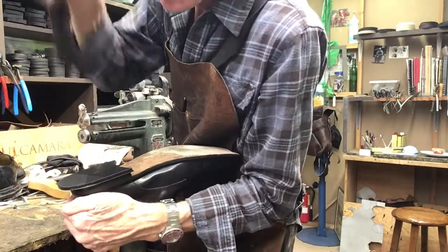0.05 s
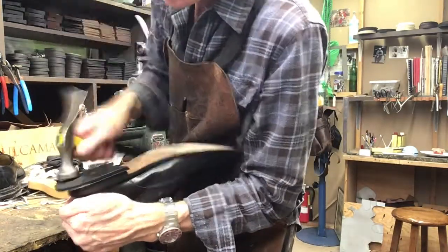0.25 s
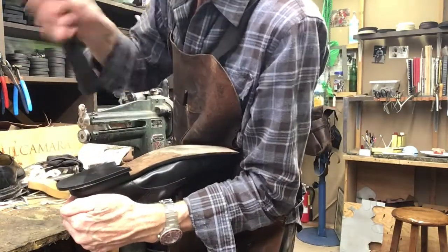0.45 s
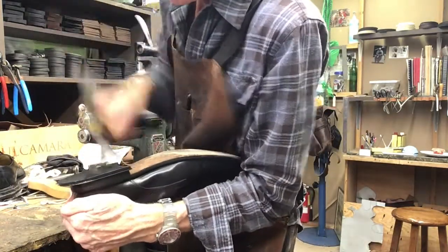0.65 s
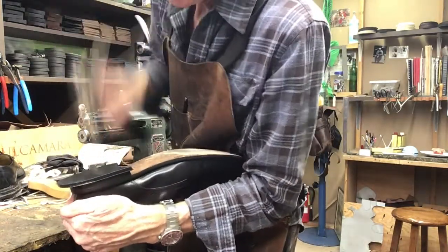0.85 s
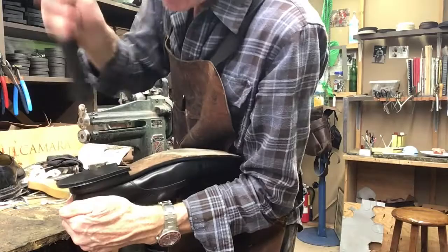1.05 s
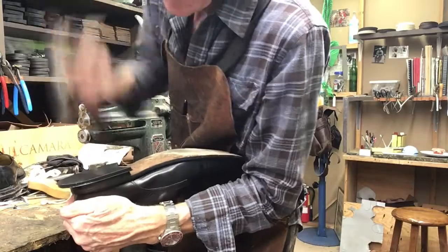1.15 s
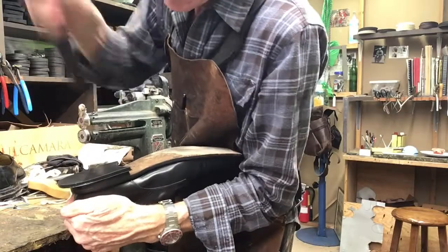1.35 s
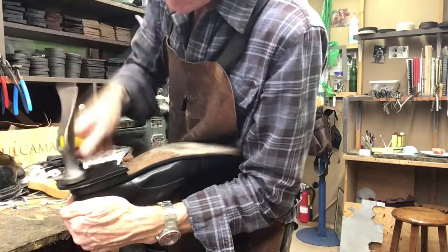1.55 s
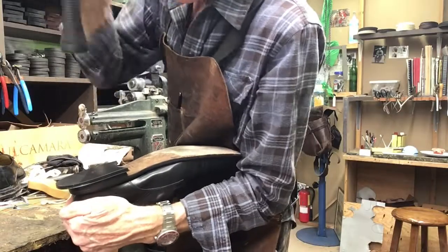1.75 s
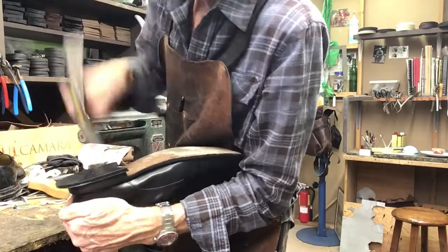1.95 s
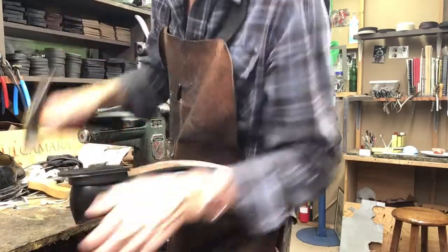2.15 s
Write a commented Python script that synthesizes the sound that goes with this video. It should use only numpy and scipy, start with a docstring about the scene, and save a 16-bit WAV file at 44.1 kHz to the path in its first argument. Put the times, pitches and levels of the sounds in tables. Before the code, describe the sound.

Close, evenly paced hammer blows land on a shoe heel in a small, quiet workshop. Six cracks with hollow thuds set the bench humming and steel ringing faintly, then the shoe shifts with a soft knock.

```python
"""A cobbler hammers the heel of a shoe at a workbench, close by, about three blows a second.
Each blow is a sharp crack as the hammer lands and a hollow thud from the shoe. The bench hums on,
the steel rings faintly, and the small crowded workshop echoes. A light knock follows the last blow.
Quiet room air lies under it all, and the loudest peaks overload the recorder."""
import sys
import numpy as np
from scipy import signal
from scipy.fft import rfft, irfft
from scipy.io import wavfile
from scipy.ndimage import uniform_filter1d

SR = 44100
rng = np.random.default_rng(int(sys.argv[2]) if len(sys.argv) > 2 else 0)


def file_out(sig):
    """Save sig as 16-bit WAV at sys.argv[1]."""
    # one column per channel
    cols = np.atleast_2d(sig).T
    # limit, then scale
    lim = np.clip(cols, -1, 1)
    pcm = np.round(lim * 32767).astype(np.int16)
    wavfile.write(sys.argv[1], SR, pcm)


N = 97020
T = np.arange(N) / SR
HZ = np.fft.rfftfreq(N, 1 / SR)  # the frequencies in a spectrum of the whole sound
# A "fade time" (t60) is the time in seconds that a sound needs to drop by 60 dB.


def hammering():
    """All the blows: the crack comes first, then the thud and the ringing, then the room's echo."""
    # Each row: start in seconds, level in dB, crack in dB, pitch of the thud as a ratio, upper thud in dB,
    # low bench ring in dB, high bench ring in dB, steel in dB, clack pitch in Hz, clack in dB,
    # echo treble in dB, treble cutoff in Hz. The dB values turn each part up or down for that blow.
    # The first blow lands just before the sound begins.
    blows = [(-.115, -2, -2, 1, -5, -2, -7.5, 4, 2280, -2, 3, 13000),
             (.2326, 0, 5, 0.952, 4.5, 2, -9.5, -1.5, 2110, -10, 3.5, 12500),
             (.5867, -1.5, 2.5, 1.102, 0, -7, 3.5, -18, 2050, -2, 1, 19000),
             (.8789, -1.5, 0.5, 1.096, -1, 5, 4.5, -11.5, 2460, -3.5, -4, 16200),
             (1.1926, 1, 2.5, 1.0, -1, 5.5, -1.5, -7, 1557, -4, 0.5, 13400),
             (1.5379, -0.5, 0, 0.99, 5.5, 5.5, -4, -1, 3270, -8.5, 3, 12400),
             (1.8886, -1.5, 6, 1.06, -12, 4.5, 2, -15, 2600, -0.5, 5, 13100)]
    shared_noise = rng.standard_normal(N)
    out = 0
    for (start, db, crack_db, pitch, upper_db, low_db, high_db,
         steel_db, clack_hz, clack_db, treble_db, cutoff_hz) in blows:
        contact = undb(crack_db) * crack() + undb(clack_db) * clack(clack_hz)
        thud = at(shoe_thud(pitch, upper_db), seconds=.0007)
        rings = bench_ring(low_db, high_db) + undb(steel_db) * steel_ring()
        echo = at(brighten(workshop_echo(shared_noise), treble_db), seconds=.0035)
        soften = signal.butter(3, cutoff_hz, fs=SR, output="sos")  # a softer hit has less top treble
        blow = signal.sosfilt(soften, contact + thud + rings + echo)
        out = out + undb(db) * at(blow, start)
    return out


def crack():
    """The hammer face meets the heel in a very short burst of noise."""
    # Each row: frequency in Hz, relative level in dB.
    spectrum = [(300, 16.5), (1000, 12), (2000, -5), (3500, 4), (6000, -11), (10000, -11), (13500, -9),
                (16000, -16)]
    return undb(1.5) * colour(rng.standard_normal(N), spectrum) * fade(t60=.0088)


def clack(hz):
    """The heel gives a short hard note that trails off in the room; where it is hit sets the pitch."""
    trail = undb(-14) * cluster(hz, spread_hz=240) * fade(t60=.22)
    return undb(-7) * (tone(hz) * fade(t60=.027) + trail)


def shoe_thud(pitch, upper_db):
    """The heel thuds hollowly: each of its notes holds for a few cycles, then the hand damps it."""
    # Notes of the shoe on its iron stand. Each row: pitch in Hz, relative level in dB, fade time in seconds.
    notes = [(63.4, -31.5, 0.17), (137.7, -20.5, 0.036), (337, -0.5, 0.0053), (656, -5.5, 0.019),
             (825, -10.5, 0.02), (1080, -6, 0.015), (1380, -11, 0.02)]
    upper_above_hz, hold_cycles = 500, 2.2
    thud = 0
    for hz, db, t60 in notes:
        gain = undb(db + upper_db * (hz > upper_above_hz))
        time_damped = np.maximum(T - hold_cycles / hz, 0)
        thud = thud + gain * tone(hz * pitch) * np.exp(-np.log(1000) * time_damped / t60)
    return thud * rise(seconds=.0012)


def bench_ring(low_db, high_db):
    """The bench takes up the blow and hums; where the blow lands decides which notes ring most."""
    # Each row: pitch in Hz, relative level in dB, fade time in seconds.
    notes = [(109, -24, .2), (284, -17, .28), (316, -26, .25), (400, -15.5, .36), (422, -19, .26),
             (458, -26, .22), (548, -22, .2), (622, -24, .18), (670, -27, .2), (974, -26, .18)]
    low_below_hz = 350
    ring = 0
    for hz, db, t60 in notes:
        gain = undb(db + (low_db if hz < low_below_hz else high_db))
        ring = ring + gain * tone(hz) * fade(t60)
    hollow_top = undb(-24.5 + high_db) * cluster(hz=410, spread_hz=70) * fade(t60=.44)
    return (undb(-1) * ring + hollow_top) * rise(seconds=.018)


def steel_ring():
    """The hammer head and the iron stand ring thinly; close notes waver, a little differently each blow."""
    # Each row: middle pitch of a group of notes in Hz, relative level in dB, fade time in seconds.
    groups = [(1310, -3, .18), (2110, -7, .25), (2580, -6, .2), (3150, -9, .27), (3370, -6, .24),
              (3570, -8, .24), (3945, -1, .15), (4325, -4, .16), (5240, -9, .18), (5790, -9, .17),
              (6200, -12, .2), (6748, -2, .17), (7510, -14, .24), (8820, -11, .23)]
    ring = sum(undb(db) * cluster(hz, spread_hz=37) * fade(t60) for hz, db, t60 in groups)
    return undb(-19.5) * ring * rise(seconds=.0013)


def workshop_echo(shared_noise):
    """The small room gives a short dense echo, and tools and shelves ring on for longer."""
    # Each row in both tables: frequency in Hz, relative level in dB, fade time in seconds.
    room_bands = [(40, -22.5, 0.084), (100, -4.5, 0.1), (190, -9.5, 0.46), (306, 7.5, 0.25),
                  (700, -3.5, 0.3), (1020, -4, 0.27), (1570, -14, 0.28), (3550, -14.5, 0.27),
                  (4810, -20, 0.25), (7400, -26, 0.23), (12600, -22.5, .18), (16000, -35, 0.23)]
    shelf_bands = [(104, -25, .7), (200, -4, 1), (405, 4, 0.74), (1050, -2, 0.85), (2000, 3, 0.4),
                   (3020, -21, 0.74), (3180, 0, 0.63), (4320, -18, 0.61), (9150, -26, 0.26),
                   (16000, -33, 0.38)]
    share = .87  # the part of the short echo's power that all blows have in common
    noise = np.sqrt(share) * shared_noise + np.sqrt(1 - share) * rng.standard_normal(N)
    room = undb(-12) * fading_noise(rippled(noise), room_bands)
    shelves = undb(-34) * fading_noise(rippled(rng.standard_normal(N)), shelf_bands)
    return (room + shelves) * rise(seconds=.0017)


def rippled(noise):
    """Each hit gives its echo its own narrow random peaks and dips in the treble."""
    depth_db, width_hz, full_above_hz = 2.6, 70, 2500
    bins = int(width_hz / HZ[1])
    bumps = uniform_filter1d(uniform_filter1d(rng.standard_normal(len(HZ)), bins), bins)
    ripple_db = depth_db * bumps / np.std(bumps) * np.minimum(HZ / full_above_hz, 1)
    return irfft(rfft(noise) * undb(ripple_db), N)


def knock():
    """The shoe shifts with a soft thump, and the room answers."""
    # Each row: frequency in Hz, relative level in dB, fade time in seconds.
    echo_bands = [(100, -10, 0.14), (270, 5, 0.29), (504, 5.5, 0.1), (930, -7.5, 0.27), (1470, 1.5, 0.12),
                  (2400, -10.5, 0.2), (3640, -4.5, 0.24), (4760, -17, 0.14), (8900, -33.5, 0.26),
                  (15000, -42, 0.19)]
    thump_seconds = .029
    thump = undb(-31) * tone(hz=269) * np.sin(np.pi * np.minimum(T / thump_seconds, 1))
    echo = undb(-31.5) * fading_noise(rippled(rng.standard_normal(N)), echo_bands)
    return thump + echo * rise(seconds=.0015)


def room_air():
    """The air of the workshop makes a quiet, steady, low rush."""
    # Each row: frequency in Hz, relative level in dB.
    spectrum = [(25, -20), (38, -13), (55, -6.5), (90, -3.5), (130, 0.5), (200, -11.5), (300, -1),
                (600, -5.5), (1200, -16), (2200, -18.5), (5000, -30), (15000, -49)]
    return undb(-50) * colour(rng.standard_normal(N), spectrum)


def undb(db):
    """Turn decibels into a number to multiply by."""
    return 10 ** (np.asarray(db) / 20)


def tone(hz):
    """A steady pure note."""
    return np.sin(2 * np.pi * hz * T)


def fade(t60):
    """A level that drops by 60 dB every t60 seconds."""
    return np.exp(-np.log(1000) * T / t60)


def rise(seconds):
    """A soft start: the level climbs about two thirds of the way in the given time."""
    return 1 - np.exp(-T / seconds)


def at(x, seconds):
    """Move a sound to a start time; whatever falls before zero is cut off."""
    shift = int(round(seconds * SR))
    delay, skip = max(shift, 0), max(-shift, 0)
    return np.pad(x, (delay, skip))[skip:skip + N]


def look_up(hz, table, column):
    """Read a table column between its rows, giving every octave the same room."""
    table = np.array(table, float)
    return np.interp(np.log(hz + 1e-9), np.log(table[:, 0]), table[:, column])


def colour(noise, spectrum):
    """Shape noise to a spectrum, with nothing below 22 Hz and an average (rms) size of 1."""
    gain = undb(look_up(HZ, spectrum, column=1)) * (HZ > 22)
    x = irfft(rfft(noise) * gain, N)
    return x / np.std(x)


def fading_noise(noise, bands):
    """Shaped noise in which every frequency dies away at its own rate."""
    hz, times, slices = signal.stft(colour(noise, bands), SR, nperseg=512)
    t60 = look_up(hz, bands, column=2)[:, None]
    return signal.istft(slices * np.exp(-np.log(1000) * times / t60), SR, nperseg=512)[1][:N]


def cluster(hz, spread_hz):
    """Many close notes around one pitch, with an average (rms) size of 1."""
    bell_curve = np.exp(-.5 * ((HZ - hz) / spread_hz) ** 2)
    x = irfft(bell_curve * np.exp(2j * np.pi * rng.random(len(HZ))), N)
    return x / np.std(x)


def brighten(x, db, above_hz=3000):
    """Turn the treble up or down."""
    treble = signal.sosfilt(signal.butter(1, above_hz, "high", fs=SR, output="sos"), x)
    return x + (undb(db) - 1) * treble


def scene():
    """Hammering and a light knock over quiet room air, in one channel."""
    return (hammering() + at(knock(), seconds=2.1005) + room_air())[None]


def record(dry):
    """The recorder rounds off the loudest peaks and cuts the highest treble."""
    hardness, top_hz = 3.1, 15900
    rounded = dry / (1 + np.abs(dry) ** hardness) ** (1 / hardness)
    return signal.sosfilt(signal.ellip(8, .2, 70, top_hz, fs=SR, output="sos"), rounded)


dry = scene()
out = record(dry)
file_out(out)
```